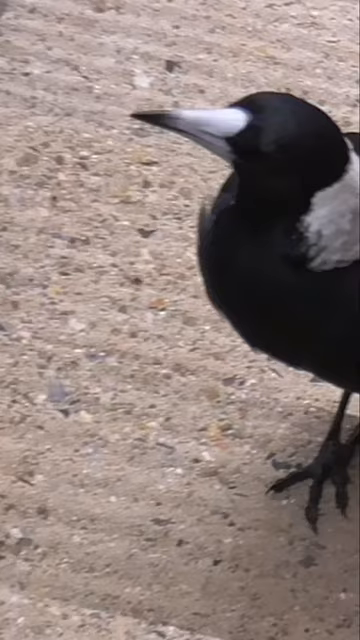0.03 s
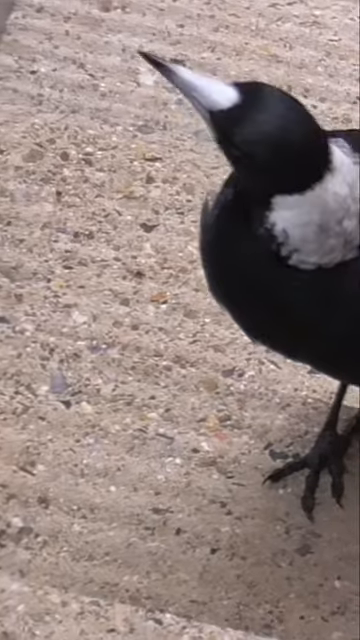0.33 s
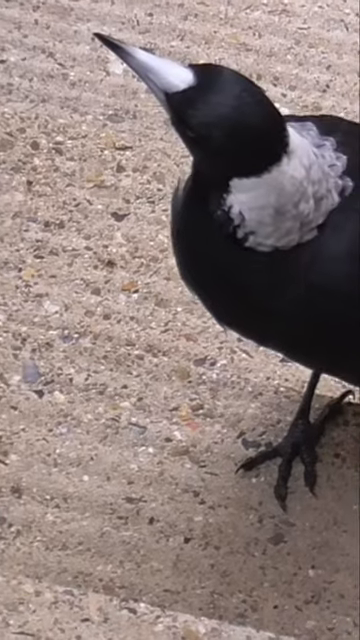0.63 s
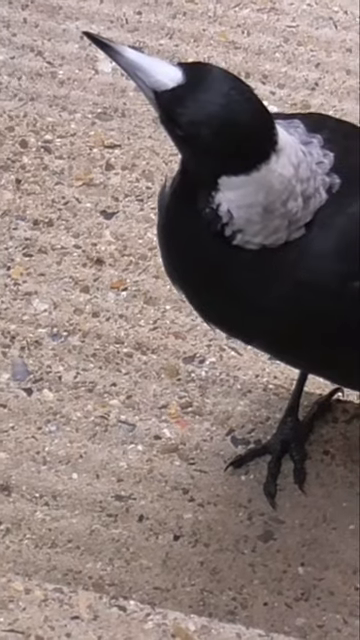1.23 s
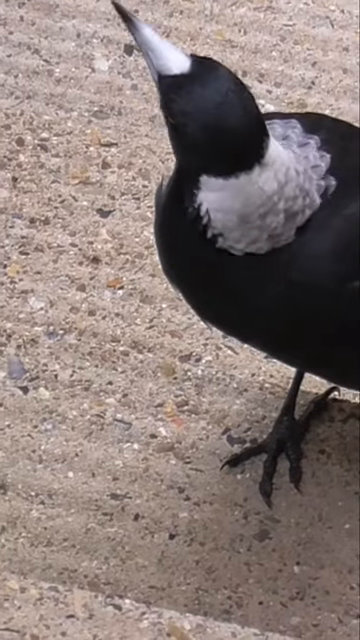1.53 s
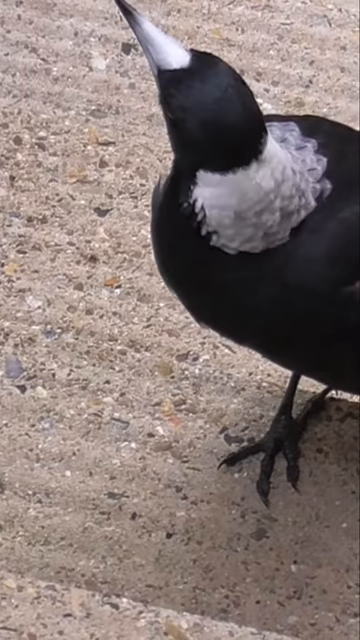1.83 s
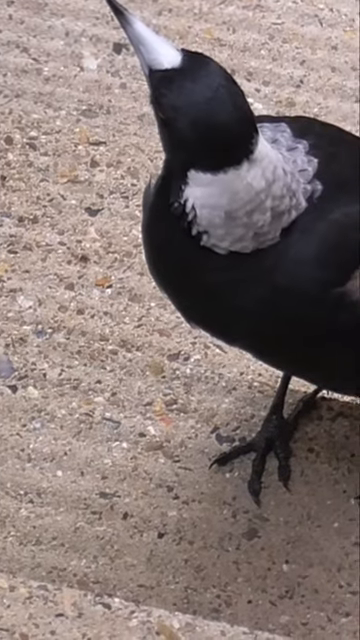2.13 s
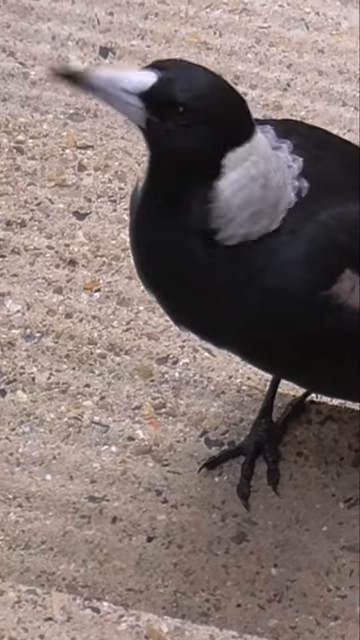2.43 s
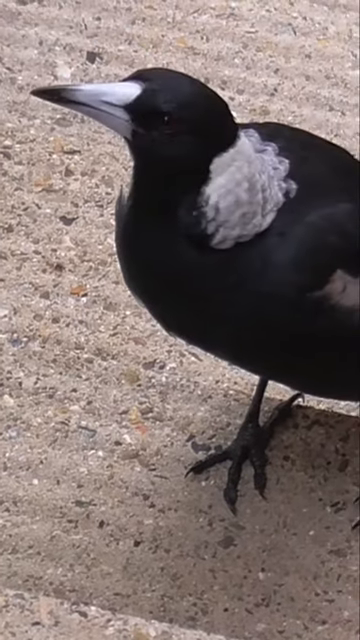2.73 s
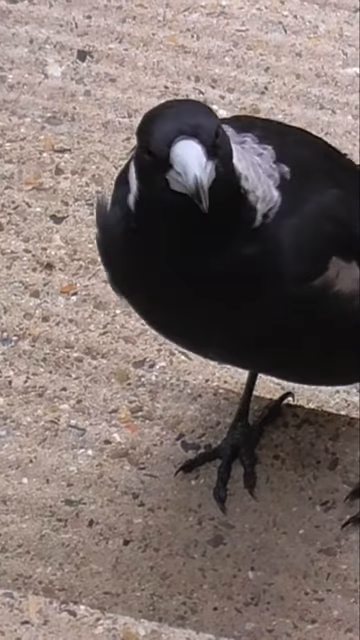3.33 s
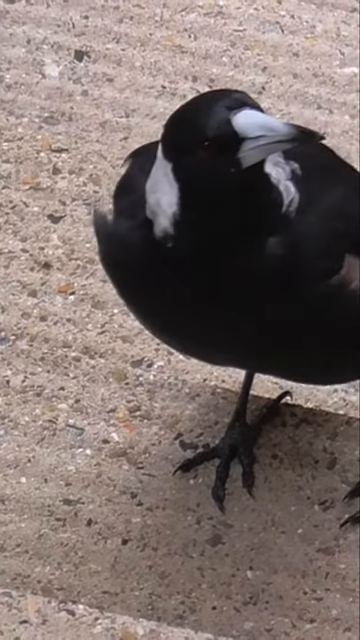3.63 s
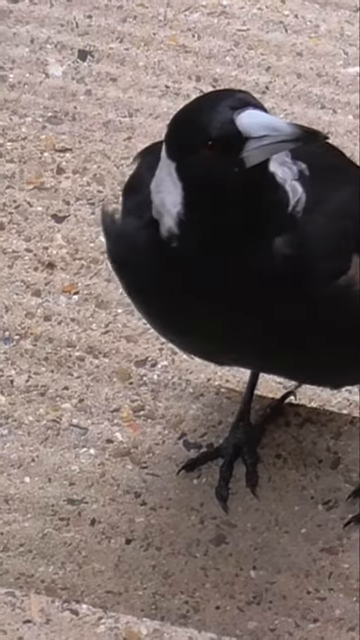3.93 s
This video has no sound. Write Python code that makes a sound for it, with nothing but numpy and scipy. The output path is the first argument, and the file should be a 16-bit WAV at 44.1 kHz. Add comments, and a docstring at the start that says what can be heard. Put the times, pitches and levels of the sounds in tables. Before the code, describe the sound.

Distant traffic rumbles throughout, heard from a paved yard over a faint, thin hiss. Two pairs of soft, rattling knocks come at about 0.2 and 0.5 seconds, while an engine drone fades by 2 seconds. From about 1.5 seconds another engine pulls away with a rising hum. A far bird chirps once, faintly, just after 2 seconds. Tyre roar grows from 3 to 4 seconds as a vehicle nears.

```python
"""Distant traffic heard from a paved yard: a dull road rumble, and tyre roar that grows as a vehicle nears.
One engine drones and fades, another pulls away with a rising hum, and other hums come and go.
Early on, two pairs of soft knocks ring and rattle. A thin high hiss swells and drops over the
microphone's own noise, and a far bird chirps once."""
import sys
import numpy as np
from scipy import signal
from scipy.fft import rfft, irfft
from scipy.io import wavfile

SR = 44100
rng = np.random.default_rng(int(sys.argv[2]) if len(sys.argv) > 2 else 0)


def wav_out(sig):
    """Save sig, one row per channel (or a flat mono array), as 16-bit PCM at SR to the path in sys.argv[1]."""
    wavfile.write(sys.argv[1], SR, np.round(np.clip(np.atleast_2d(sig).T, -1, 1) * 32767).astype(np.int16))


N = 176400
T = np.arange(N) / SR
HZ = np.maximum(np.arange(N // 2 + 1) * SR / N, 1)


def from_db(db):
    """Turn decibels into a gain."""
    return 10 ** (np.asarray(db) / 20)


def unit_power(x):
    """Scale a signal to an average power of 1."""
    return x / np.sqrt(np.mean(x ** 2) + 1e-20)


def over_time(rows):
    """Join a table's points in time: one curve for each column after the first."""
    times, *columns = np.transpose(rows)
    return [np.interp(T, times, column) for column in columns]


def over_frequency(rows):
    """Join a table's points along a log frequency scale."""
    hz, value = np.transpose(rows)
    return np.interp(np.log(HZ), np.log(hz), value)


def drift(rate_hz):
    """A random wander of typical size 1, mostly slower than the rate."""
    return unit_power(irfft(rfft(rng.standard_normal(N)) / (1 + (HZ / rate_hz) ** 2), N))


def flicker(rate_hz, depth_db):
    """A gain that wavers at random."""
    return from_db(depth_db * drift(rate_hz))


def steadied(x, rate_hz):
    """Even out swings in loudness slower than the rate, keeping the fast grain."""
    power = irfft(rfft(np.mean(x ** 2, axis=0)) * np.exp(-(HZ / rate_hz) ** 2), N)
    return unit_power(x / np.sqrt(np.abs(power) + .05 * power.mean()))


def pan(db):
    """Left and right gains; below 0 dB the sound leans right."""
    return from_db(np.array([[db], [-db]]) / 2)


def stereo_noise(gain, likeness):
    """Noise with a gain for each frequency; left and right are alike (1), unrelated (0) or opposite (-1)."""
    alike = np.clip(likeness, -.999, .999)
    mid, side = np.exp(2j * np.pi * rng.random((2, len(HZ)))) * gain
    spectrum = np.sqrt(1 + alike) * mid + np.sqrt(1 - alike) * side * np.array([[1], [-1]])
    return unit_power(irfft(spectrum, N))


# how alike far sounds are on the left and right: f/Hz, likeness
FAR_LIKENESS = [(40, 0.79), (130, 0.98), (270, 0.98), (450, 0.86), (700, 0.62), (1200, 0.65), (2000, 0.45),
                (4000, 0.37), (10000, .1)]
def far_noise(colour):
    """Distant noise of a given tone colour; its highs spread wider than its lows."""
    return stereo_noise(from_db(over_frequency(colour)), over_frequency(FAR_LIKENESS))


def ringing(bands):
    """Noise that rings evenly in narrow bands, each given as f/Hz, half-width/Hz, level/dB."""
    out = 0
    for hz, width, db in bands:
        band = stereo_noise(1 / (1 + ((HZ - hz) / width) ** 2), over_frequency(FAR_LIKENESS))
        out += from_db(db) * steadied(band, rate_hz=11.3)
    return out


# tone colour of the rumble: f/Hz, level/dB
RUMBLE_COLOUR = [(25, -32), (45, -19), (70, -10.5), (100, -6), (125, -0.5), (160, -4.5), (200, 2),
                 (250, -1), (300, -0.5), (330, -4), (375, 0.5), (470, -3.5), (540, -7), (700, -8),
                 (900, -11.5), (1300, -23.5), (1700, -31), (3000, -53)]
# its loudness: t/s, level/dB
RUMBLE_LOUDNESS = [(.15, -35.5), (.6, -35.3), (1.1, -35.5), (1.75, -36.5), (2.15, -36.5), (2.6, -36),
                   (3.05, -35.5), (3.3, -35), (3.55, -35.3), (3.8, -34), (4, -33)]
# its booming notes: f/Hz, half-width/Hz, level/dB
BOOM_BANDS = [(423, 5.6, -49), (470.4, 13, -50.5), (247.3, 18, -45), (767, 20, -55), (970, 14, -57.5)]
def road_rumble():
    """Far traffic rumbles, with a few booming notes that follow its loudness."""
    db, = over_time(RUMBLE_LOUDNESS)
    rumble = steadied(far_noise(RUMBLE_COLOUR), rate_hz=3.7) * flicker(rate_hz=27, depth_db=0.98)
    return from_db(db) * rumble + from_db(db - db.mean()) * ringing(BOOM_BANDS)


# tone colour of the tyres: f/Hz, level/dB
TYRE_COLOUR = [(300, -28), (600, -8), (850, -0.5), (1130, 1.5), (1400, -3.5), (1550, -10.5), (1720, -25.5),
               (2050, -18.5), (2450, -19.5), (2800, -32), (3500, -24), (4500, -28.5), (6000, -34.5),
               (14000, -54)]
# their loudness: t/s, level/dB
TYRE_LOUDNESS = [(.15, -45.5), (.7, -46), (1.3, -45.5), (1.65, -43), (2.1, -44), (2.6, -45), (3.1, -41.5),
                 (3.5, -40.5), (3.85, -37), (4, -38)]
# echoes from around the yard: delay/s, level/dB
YARD_ECHOES = [(.0068, -27), (0.0176, -14), (0.032, -12), (0.054, -14.5), (.087, -9)]
def tyre_roar():
    """Tyres grow louder as a vehicle nears; echoes boost some frequencies and weaken others."""
    db, = over_time(TYRE_LOUDNESS)
    echoes = sum(from_db(level) * np.exp(-2j * np.pi * HZ * delay) for delay, level in YARD_ECHOES)
    roar = unit_power(irfft(rfft(far_noise(TYRE_COLOUR)) * (1 + echoes), N))
    return from_db(db) * pan(-1.4) * roar * flicker(rate_hz=8.5, depth_db=0.9)


# notes of the exhaust: f/Hz, half-width/Hz, relative level/dB
DRONE_BANDS = [(192.8, 3, -5), (201, 13.6, -4), (221, 25, -3.5)]
# its loudness: t/s, level/dB
DRONE_LOUDNESS = [(.15, -34.5), (.25, -48), (.35, -32), (.41, -41), (.6, -35), (.68, -38.5), (.79, -31),
                  (.88, -41.5), (1.1, -40.5), (1.37, -38.5), (1.6, -43), (1.9, -57), (4, -88)]
def droning_engine():
    """An exhaust throbs, blurred by distance, and dies away."""
    db, = over_time(DRONE_LOUDNESS)
    return from_db(db) * ringing(DRONE_BANDS) * flicker(rate_hz=38, depth_db=2)


# tone colour of the microphone's noise: f/Hz, level/dB
MIC_COLOUR = [(1500, 4), (2800, 0), (3600, 0), (4700, -0.5), (5600, -6.5), (6600, -4), (7800, 2),
              (9200, -0.5), (11000, -2.5), (13000, -3.5), (14500, -14)]
# its loudness: t/s, level/dB
MIC_LOUDNESS = [(.15, -55), (1.9, -56.5), (3, -54), (4, -54.5)]
# how alike left and right are: f/Hz, likeness
MIC_LIKENESS = [(2000, 0.37), (4500, 0.51), (8000, 0.31), (13000, -0.25)]
def microphone_hiss():
    """The microphone makes a faint, nearly steady hiss of its own."""
    db, = over_time(MIC_LOUDNESS)
    return from_db(db) * stereo_noise(from_db(over_frequency(MIC_COLOUR)), over_frequency(MIC_LIKENESS))


# swells of high hiss: start of rise t/s, start of fall t/s, level/dB
SWELL_TIMES = [(-.1, .35, -60), (0.419, 1.238, -62.5), (1.36, 1.833, -59.5), (1.98, 2.51, -59.5),
               (2.68, 3.268, -59.5), (3.3, 4.1, -61)]
# their tone colour: f/Hz, level/dB
SWELL_COLOUR = [(8500, -15), (9800, -2), (10800, 7), (12300, 2.5), (13500, 0), (14600, -17)]
def high_hiss(rise_s=0.23, fall_s=.06):
    """A thin hiss rises slowly and drops quickly, again and again."""
    loudness = sum(from_db(db) * np.clip((T - start) / rise_s, 0, 1) * np.clip(1 - (T - end) / fall_s, 0, 1)
                   for start, end, db in SWELL_TIMES)
    return loudness * pan(-0.5) * stereo_noise(from_db(over_frequency(SWELL_COLOUR)), likeness=-0.14)


# the knocks: t/s, thud level/dB, rattle level/dB, time for the thud to fall 60 dB/s, rise time/s
KNOCK_HITS = [(0.191, -27.5, -46, 0.37, .002), (0.254, -53, -46.5, 0.49, 0.0089),
              (.44, -25.5, -44, 0.32, 0.0045), (0.506, -37, -49, 0.37, 0.0087)]
# notes that every knock rings with: f/Hz, half-width/Hz, relative level/dB
KNOCK_NOTES = [(194, 59, -2), (388, 32, 1.5), (653, 23, -11), (900, 69, -8.5), (1420, 45, -15)]
# tone colour of the thud: f/Hz, level/dB
THUD_COLOUR = [(80, -15), (200, 3), (380, -2), (650, -6), (950, -6.5), (1400, -15), (1800, -38),
               (3000, -49)]
# tone colour of the rattle: f/Hz, level/dB
RATTLE_COLOUR = [(1000, 1), (1500, 2), (2100, 5.5), (2800, -7.5), (3700, 0), (5000, -9), (6200, -22),
                 (8000, -8.5), (13000, -27)]
def knocks(blow_db=-2, blow_damping=1.4, rattle_time_share=0.79):
    """Each blow rings a few notes and leaves a dull thud and a gritty rattle that dies sooner."""
    thud = steadied(far_noise(THUD_COLOUR) + ringing(KNOCK_NOTES), rate_hz=44)
    rattle = unit_power(far_noise(RATTLE_COLOUR) * flicker(rate_hz=500, depth_db=1))
    blow = sum(from_db(db) * np.exp(-np.pi * blow_damping * width * T) * np.sin(2 * np.pi * hz * T)
               for hz, width, db in KNOCK_NOTES)
    blow /= np.abs(blow).max()
    out = 0
    for start, thud_db, rattle_db, decay_s, rise_s in KNOCK_HITS:
        age = T - start
        fall_db = -60 * np.maximum(age, 0) / decay_s
        tail = from_db(thud_db + fall_db) * thud + from_db(rattle_db + fall_db / rattle_time_share) * rattle
        out += np.clip(age / rise_s, 0, 1) * tail
        out += from_db(thud_db + blow_db) * np.interp(age - rise_s, T, blow)
    return out


# other vehicles: start t/s, end t/s, f/Hz, half-width/Hz, level/dB
VEHICLE_HUMS = [(1.4, 2.2, 128.6, 2.3, -50), (1.67, 2.45, 339, 1, -46), (2.5, 2.85, 418, 4.9, -44),
                (3.3, 3.9, 305, 2.7, -49.5), (3.3, 3.85, 420, 7.1, -41), (3.8, 4.2, 392, 14, -47),
                (3.585, 4.3, 250, 19, -39.5), (3.07, 4.3, 1110, 11, -49.5), (2.2, 4.3, 1240, 13.2, -55)]
def passing_hums(fade_s=0.24):
    """The hums of other vehicles fade in and out of the traffic."""
    return sum(np.clip(np.minimum(T - start, end - T) / fade_s + .5, 0, 1) * ringing([(hz, width, db)])
               for start, end, hz, width, db in VEHICLE_HUMS)


# the engine pulling away: t/s, firing rate f/Hz, level/dB
ENGINE_RUN = [(.15, 62.3, -70), (1.45, 62.4, -62), (1.88, 63.57, -43.5), (2.13, 65, -53),
              (2.36, 68.6, -45.5), (2.54, 69.8, -50.5), (2.68, 72.35, -42.5), (3.1, 76.44, -44.5),
              (3.35, 80.4, -41), (3.66, 82.35, -45), (4, 86.2, -41)]
# its tones: multiple of the firing rate, relative level/dB
ENGINE_TONES = [(1, 3), (2, -5), (3, -18), (4, -5.5)]
def rising_engine(wobble=0.0071, flutter_db=1.1):
    """An engine fires faster and faster, so its hum rises; each tone wavers in loudness."""
    hz, db = over_time(ENGINE_RUN)
    phase = 2 * np.pi * np.cumsum(hz * (1 + wobble * drift(rate_hz=6))) / SR
    hum = 0
    for multiple, tone_db in ENGINE_TONES:
        flutter = flicker(rate_hz=8.3, depth_db=flutter_db * np.sqrt(multiple))
        hum += from_db(tone_db) * flutter * np.sin(multiple * phase + 2 * np.pi * rng.random())
    return from_db(db) * hum


# the chirp's tune: t/s, f/Hz, level/dB
CHIRP_TUNE = [(2.075, 2680, -69), (2.1, 2970, -63.5), (2.118, 3290, -59.5), (2.138, 3130, -60),
              (2.152, 3130, -63), (2.17, 3450, -59.5), (2.19, 3440, -63.5), (2.225, 3390, -72)]
# its tones: multiple of the pitch, relative level/dB
CHIRP_TONES = [(1.0, -1), (1.58, -7)]
def bird(hoarseness=0.021):
    """A far bird gives one faint, slightly hoarse chirp that rises in two steps."""
    hz, db = over_time(CHIRP_TUNE)
    sounding = (T > CHIRP_TUNE[0][0]) & (T < CHIRP_TUNE[-1][0])
    phase = 2 * np.pi * np.cumsum(hz * (1 + hoarseness * drift(rate_hz=500))) / SR
    voice = sum(from_db(tone_db) * flicker(rate_hz=60, depth_db=1.5) * np.sin(multiple * phase)
                for multiple, tone_db in CHIRP_TONES)
    return sounding * from_db(db) * voice


# brief low surges: peak t/s, half-length/s, f/Hz, half-width/Hz, level/dB
RUMBLE_SURGES = [(2.117, 0.029, 342, 55, -33.5), (3.378, 0.031, 432, 25, -33), (3.735, .05, 405, 40, -38),
                 (3.767, .05, 223, 45, -36), (3.984, 0.021, 250, 24.8, -29)]
def surges():
    """A narrow part of the rumble swells for an instant."""
    return sum(np.exp(-((T - peak) / half_length) ** 2) * ringing([(hz, width, db)])
               for peak, half_length, hz, width, db in RUMBLE_SURGES)


def scene():
    """Traffic, hiss, knocks and bird add together."""
    opening = road_rumble() + tyre_roar() + droning_engine() + microphone_hiss() + high_hiss()
    return opening + knocks() + passing_hums() + rising_engine() + bird() + surges()


CUTOFF_HZ, START_S, FADE_IN_S = 14700, .147, 0.0044
def record(dry):
    """The highest treble is cut, and the sound switches on after a moment of silence."""
    low_pass = signal.ellip(12, .1, 90, CUTOFF_HZ, fs=SR, output="sos")
    return signal.sosfilt(low_pass, dry) * np.clip((T - START_S) / FADE_IN_S, 0, 1)


dry = scene()
out = record(dry)
wav_out(out)
```